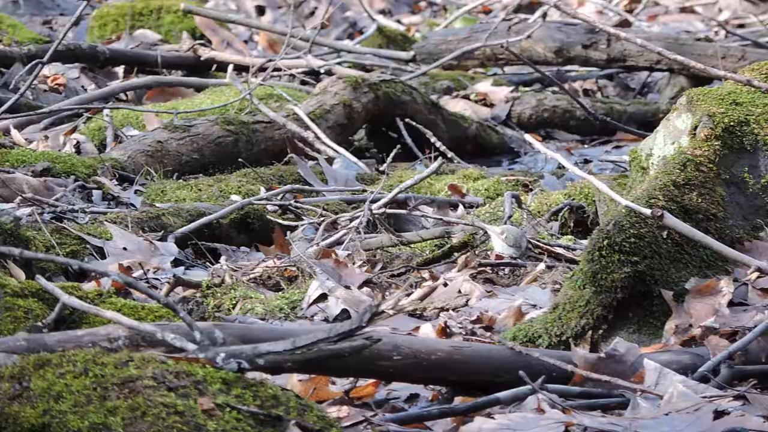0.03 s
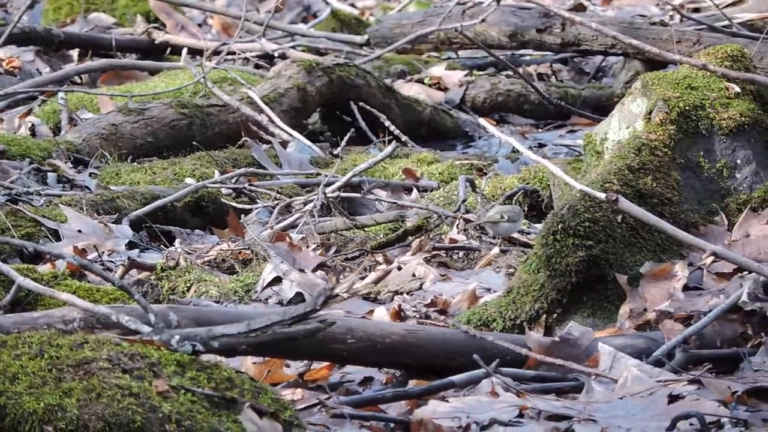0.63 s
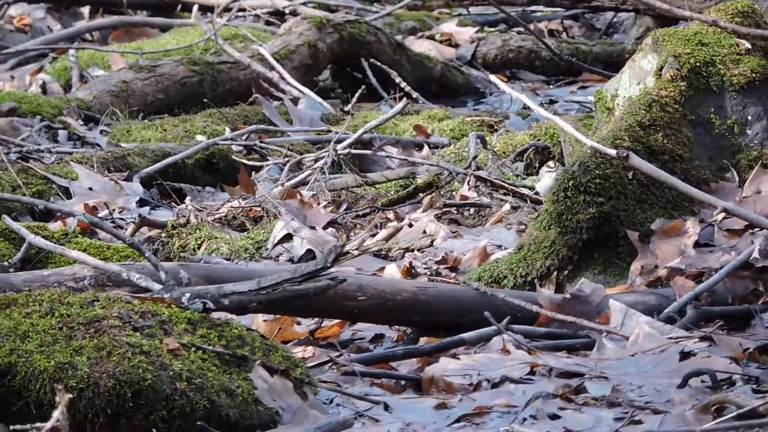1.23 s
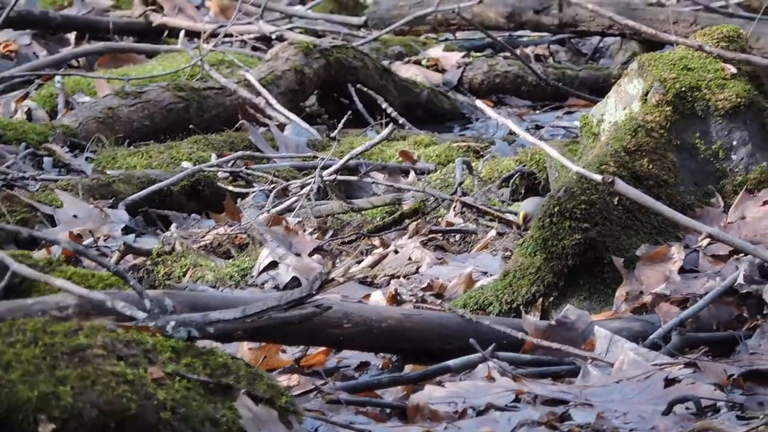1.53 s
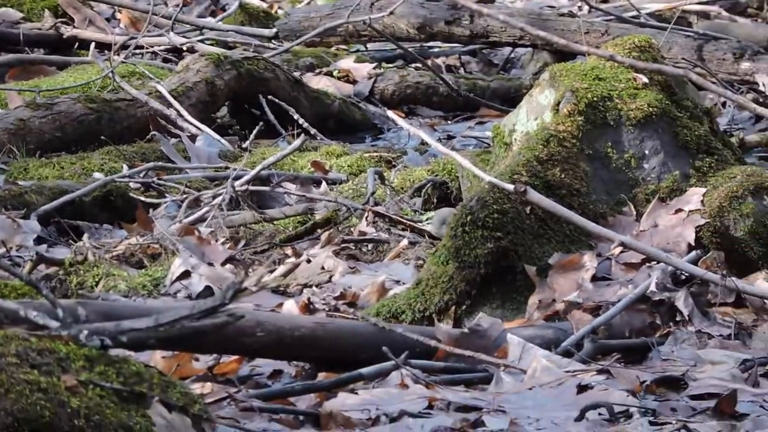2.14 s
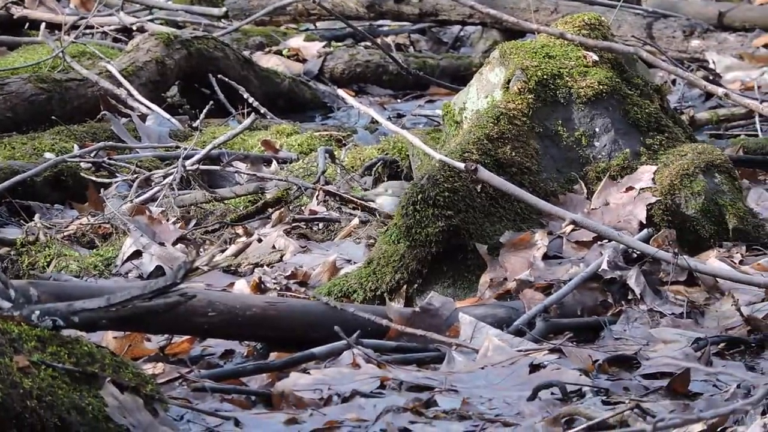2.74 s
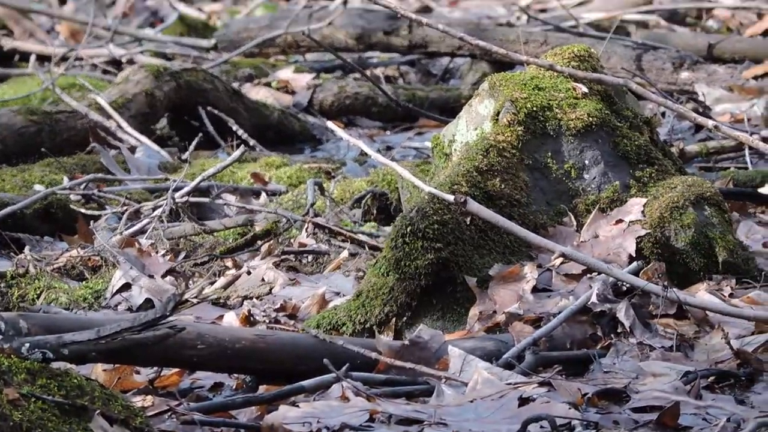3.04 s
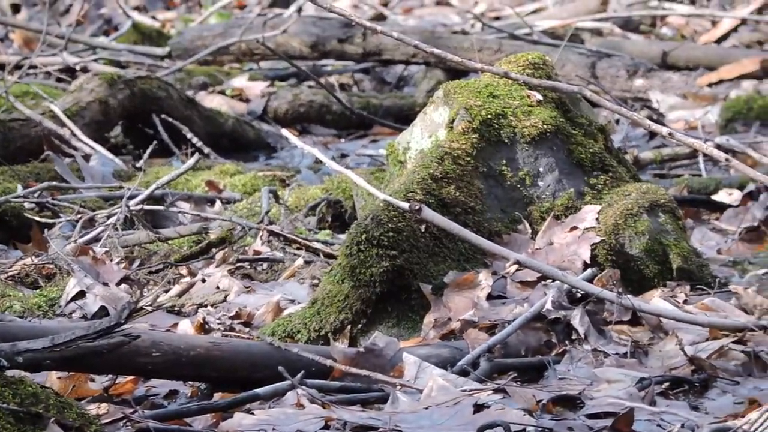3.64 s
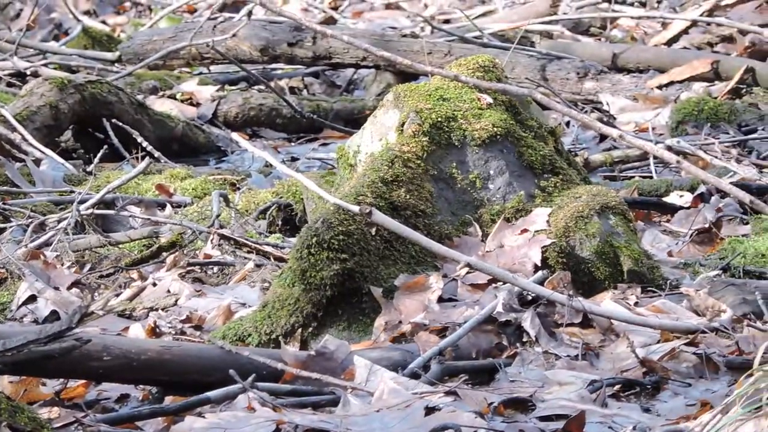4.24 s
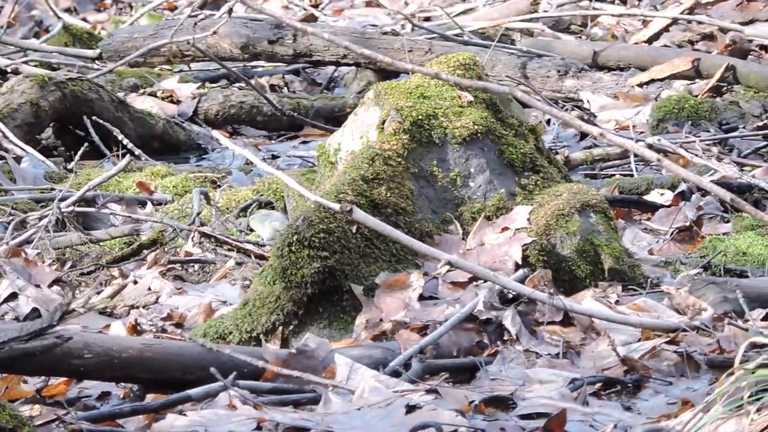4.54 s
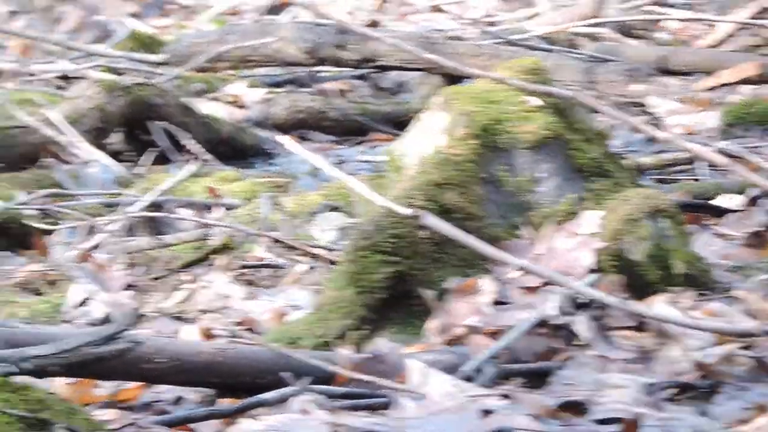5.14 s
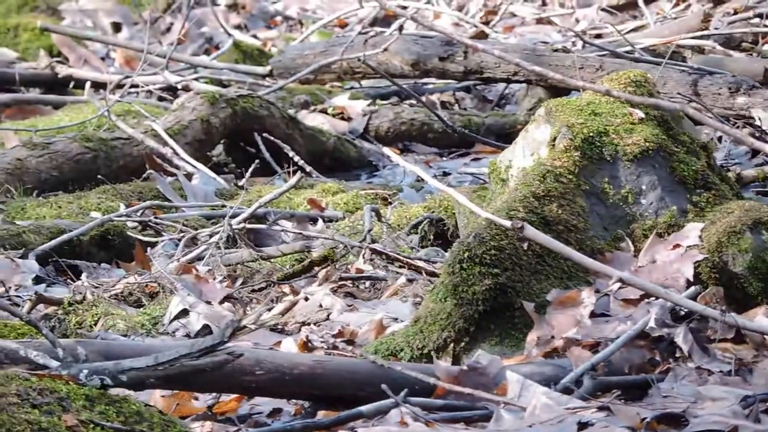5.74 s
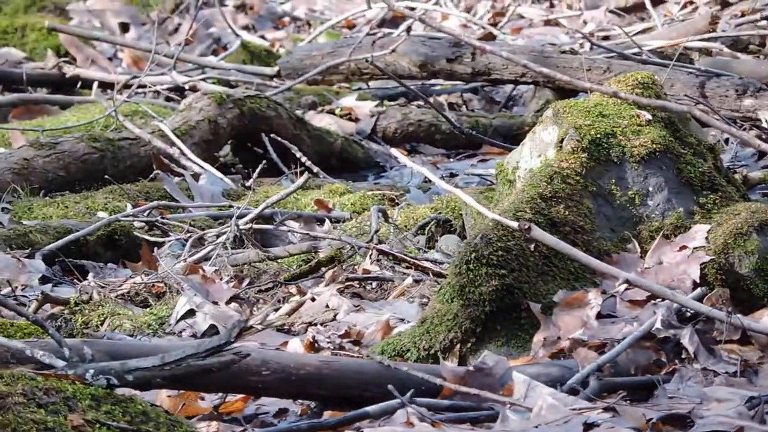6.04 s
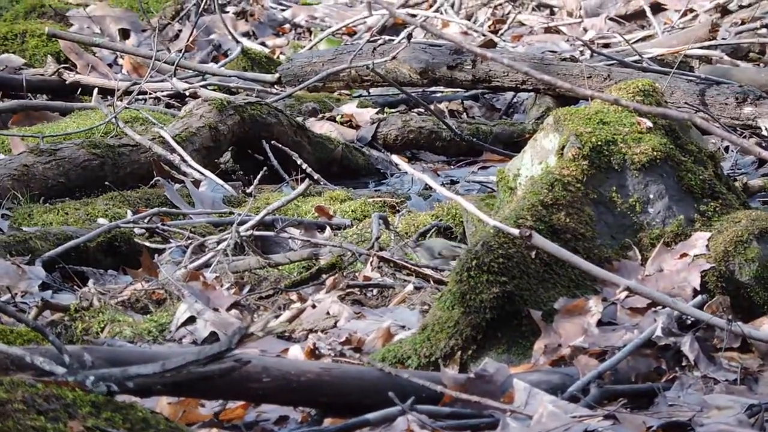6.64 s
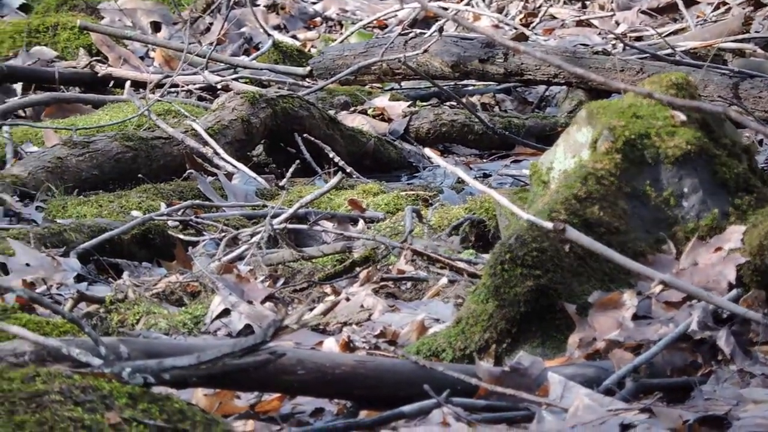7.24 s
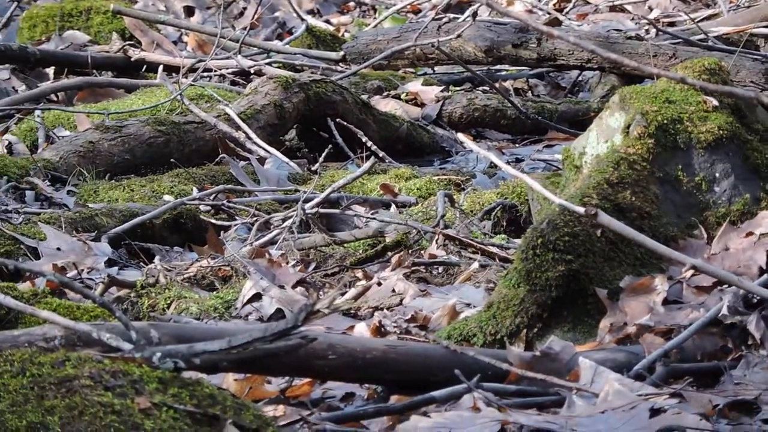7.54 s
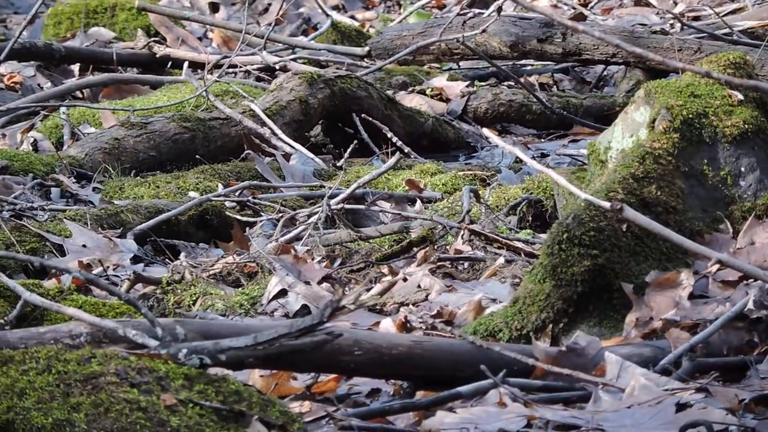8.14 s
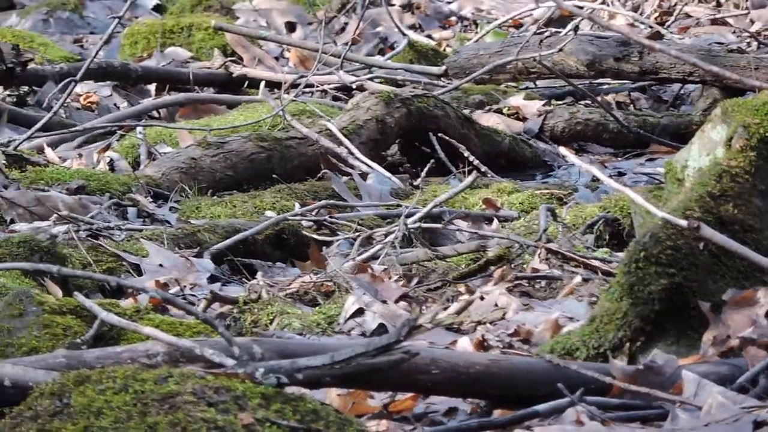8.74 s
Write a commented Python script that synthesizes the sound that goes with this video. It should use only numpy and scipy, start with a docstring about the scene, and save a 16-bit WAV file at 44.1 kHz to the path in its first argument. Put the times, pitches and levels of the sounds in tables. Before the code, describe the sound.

Far traffic rumbles steadily through a forest, mixed with a wavering machine hum, a light breeze and a soft hiss. A small songbird gives faint, thin, very high chirps at irregular intervals, and a twig ticks a few times around the middle. Near the end a distant woodpecker calls a quick, even run of hoarse notes while another bird adds three faint descending whistles. The stereo sound is quiet and wide.

```python
"""Far traffic rumbles and roars through a damp spring forest: engine and tyre noise, dulled by the air.
Distant machinery hums under it in wavering tones. A small songbird whistles thin, very high contact
calls, a far woodpecker calls a run of even notes, another bird whistles three times and a twig ticks
now and then, all scattered by the trunks. Light breeze and hiss lie behind.
The sound fades in over the first second."""
import sys
import numpy as np
from scipy import signal
from scipy.fft import rfft, irfft, next_fast_len
from scipy.io import wavfile
from scipy.ndimage import map_coordinates

SR = 44100
rng = np.random.default_rng(int(sys.argv[2]) if len(sys.argv) > 2 else 0)


def inscribe(sig):
    """Save sig as 16-bit PCM at rate SR to the path in sys.argv[1].

    A 1-D sig is mono; a 2-D sig holds one channel per row.
    Samples are clipped to [-1, 1] before scaling.
    """
    pcm = np.round(np.clip(np.atleast_2d(sig).T, -1, 1) * 32767)
    wavfile.write(sys.argv[1], SR, pcm.astype(np.int16))


N = 392490


# Traffic spectrum before air absorption: (frequency [Hz], relative density [dB])
TRAFFIC_SPECTRUM = [(10, -1.5), (22, -4.5), (42, -0.5), (62, 2), (85, 1), (115, -5), (160, -10), (215, -16),
                    (330, -15.5), (480, -22), (930, -21.5), (1300, -29), (2200, -34), (4500, -39)]
# Lull and swell of the rumble: (peak time [s], half length [s], lift [dB])
RUMBLE_SWELLS = [(.2, .7, -2.5), (4.7, 1.3, 1)]

def traffic(air_hz=4200, engine_hz=170, engine_gain_db=-43.5, tyre_gain_db=-41, tyre_db_per_s=0.0771):
    """Far engine rumble and slowly rising tyre roar; the air absorbs their treble."""
    road = diffuse(lambda hz: amp(along(TRAFFIC_SPECTRUM, hz)) / np.sqrt(1 + (hz / air_hz) ** 2) ** 3)
    rumble = filtered(road, lambda hz: 1 / (1 + (hz / engine_hz) ** 4))
    tyres = (road - rumble) * amp(tyre_gain_db + tyre_db_per_s * clock())
    engines = rumble * amp(engine_gain_db + sum(swell_db(*swell) for swell in RUMBLE_SWELLS))
    return (tyres + engines) * amp(0.12 * wobble(3.17))


# Motors: (frequency [Hz], base level [dB], waver [dB], peak time [s], half length [s], lift [dB])
MOTORS = [(93.47, -45, 1.0, 0.38, 1.35, 4.5), (120.6, -58, 2, 5.07, 1.13, 10)]
# Weaker machine tones: (frequency [Hz], level [dB], waver [dB])
HUM_TONES = [(53.4, -52, 6), (106.7, -59, 2.5), (197.3, -67.5, -0.5)]

def machinery():
    """Two motors, each swelling once, over a constant hum."""
    motors = sum(drone(hz, db + swell_db(peak_s, half_s, lift_db), waver_db)
                 for hz, db, waver_db, peak_s, half_s, lift_db in MOTORS)
    return motors + sum(drone(*tone) for tone in HUM_TONES)


def drone(hz, db, waver_db, drift_hz=.15):
    """One machine tone; moving air on the long path makes it waver."""
    phase = phase_of(hz + drift_hz * wobble(2.023))
    waver = unit(amp(waver_db * wobble(2.59)))
    return np.sqrt(2) * amp(db) * waver * np.sin(phase)


# Contact calls: (start [s], length [s], pitch [Hz], level [dB])
CONTACT_CALLS = [ (.808, .022, 7350, -70), (1.435, .03, 7350, -73), (1.918, .04, 8550, -68.5),
                 (2.522, .046, 8220, -67.5), (2.760, .028, 8400, -74), (2.848, .034, 8350, -72.5),
                 (4.843, .031, 8350, -70), (5.254, .016, 6700, -72), (5.630, .058, 7660, -61.5),
                 (7.600, .028, 7150, -72.5), (7.992, .016, 7550, -72), (8.224, .044, 7400, -70),
                 (8.762, .033, 8120, -68.5)]

def songbird(home_hz=8080, glide_s=.045, arch_hz=200, flutter_hz=170, flutter_depth=0.016,
             octave_db=-15, wet_db=-3):
    """Arched whistles that slide toward a home pitch, with fast flutter and a weak octave."""
    voice = np.zeros(N)
    for start_s, length_s, hz, db in CONTACT_CALLS:
        u = np.linspace(-.5, .5, int(length_s * SR))
        pitch_hz = hz + (home_hz - hz) * u * length_s / glide_s - arch_hz * (2 * u) ** 2
        flutter = np.sin(2 * np.pi * (flutter_hz * length_s * u + rng.random()))
        phase = phase_of(pitch_hz * (1 + flutter_depth * flutter))
        envelope = np.sqrt(np.abs(np.cos(np.pi * u)))
        add(voice, start_s, amp(db) * envelope * (np.sin(phase) + amp(octave_db) * np.sin(2 * phase)))
    return voice + amp(wet_db) * trees(voice)


def woodpecker(first_s=7.081, period_s=.139, count=12, length_s=0.0542, hz=2150, rise=.04, rough=.018,
               full_db=-65.5, build_db=7, build_s=0.97, scatter_db=.6, wet_db=-5):
    """An even run of short, hoarse, rising notes that builds and holds, blurred by the trees."""
    voice = np.zeros(N)
    u = np.linspace(-.5, .5, int(length_s * SR))
    jitter = rough * wobble(250)
    for elapsed_s in period_s * np.arange(count):
        centre_s = first_s + elapsed_s
        db = full_db - build_db * max(0, 1 - elapsed_s / build_s) + scatter_db * rng.standard_normal()
        pitch_hz = hz * (1 + rise * u + jitter[round(centre_s * SR):][:len(u)])
        add(voice, centre_s - length_s / 2, amp(db) * np.cos(np.pi * u) * np.sin(phase_of(pitch_hz)))
    return voice + amp(wet_db) * trees(voice)


# Twig ticks: (time [s], gain [dB], main ring [Hz], crack re ring [dB], left re right [dB])
TWIG_TICKS = [(3.1183, -43.5, 2520, -26, -2), (4.8737, -37.5, 1350, -11, -11), (5.4244, -55, 4500, -4, 0)]
# Twig modes: (frequency re main ring [ratio], relative level [dB])
TWIG_MODES = [(.35, -2), (1, -2), (1.6, -10), (3.5, -18)]

def twigs(ring_t60_s=.008, crack_t60_s=.008, lowpass_hz=6000, wet_db=-7):
    """Dry wood ticks: a crack and a few briefly ringing modes."""
    ticks = np.zeros((2, N))
    t = np.arange(SR // 20) / SR
    for time_s, gain_db, ring_hz, crack_db, pan_db in TWIG_TICKS:
        modes = sum(amp(db) * np.sin(2 * np.pi * ratio * ring_hz * t) for ratio, db in TWIG_MODES)
        ring = amp(-60 * t / ring_t60_s) * modes
        crack = amp(crack_db - 60 * t / crack_t60_s) * rng.standard_normal((2, len(t)))
        add(ticks, time_s, amp([[gain_db + pan_db / 2], [gain_db - pan_db / 2]]) * (ring + crack))
    ticks = filtered(ticks, lambda hz: 1 / (1 + 1j * hz / lowpass_hz))
    return ticks + amp(wet_db) * trees(ticks.mean(axis=0))


# Far whistles: (start [s], length [s], pitch [Hz], level into the trees [dB])
FAR_WHISTLES = [(7.48, .22, 7280, -81), (7.72, .2, 6520, -76), (8.03, .3, 5520, -85)]

def far_bird(direct_db=-4):
    """Three flat whistles, each lower than the last, heard mostly by way of the trees."""
    voice = np.zeros(N)
    for start_s, length_s, hz, db in FAR_WHISTLES:
        envelope = signal.windows.tukey(int(length_s * SR))
        pitch_hz = hz * (1 + 0.004 * wobble(62)[:len(envelope)])
        add(voice, start_s, amp(db) * envelope * np.sin(phase_of(pitch_hz)))
    return amp(direct_db) * voice + trees(voice)


def breeze(level_db=-57, lowpass_hz=35):
    """Light air stirs each microphone on its own."""
    buffet = filtered(rng.standard_normal((2, N)), lambda hz: 1 / (1 + (hz / lowpass_hz) ** 2))
    return amp(level_db) * unit(buffet)


# Hiss spectrum: (frequency [Hz], relative density [dB])
HISS_SPECTRUM = [(1000, -27), (2500, 1.5), (5000, 0.5), (7400, -1.5), (9500, -4), (15500, -5)]

def hiss(mid_db=-69.5):
    """Steady, wide hiss of air and microphones."""
    return amp(mid_db) * diffuse(lambda hz: amp(along(HISS_SPECTRUM, hz)))


# Forest reverberation: (frequency [Hz], T60 [s])
FOREST_T60 = [(500, 0.54), (2000, 0.86), (8000, 0.39), (15000, 0.14)]

def trees(x):
    """Trunks scatter a sound into a stereo tail whose treble dies first."""
    hz, t, noise = signal.stft(rng.standard_normal((2, SR // 2)), SR, nperseg=256)
    decay = amp(-60 * t / along(FOREST_T60, hz)[:, None])
    tail = signal.istft(noise * decay, SR, nperseg=256)[1]
    return signal.fftconvolve(x[None], tail / np.linalg.norm(tail[0]), axes=1)[:, :N]


# Diffuse field: (frequency [Hz], left-right correlation [-1..1])
STEREO_CORRELATION = [(60, 0.99), (99, 0.99), (160, 0.93), (270, 0.94), (450, 0.67), (740, 0.72),
                      (1220, 0.37), (2010, -0.041), (3330, -0.08), (5500, -0.06), (9080, -0.051),
                      (15000, -0.03)]

def diffuse(gain):
    """Noise from all around, mid at rms 1; the two microphones agree only in the bass."""
    def mid_side_gain(hz):
        angle = np.arccos(np.clip(along(STEREO_CORRELATION, hz), -1, 1)) / 2
        return gain(hz) * np.array([np.ones_like(hz), np.tan(angle)])
    mid, side = filtered(rng.standard_normal((2, N)), mid_side_gain)
    return np.array([mid + side, mid - side]) / np.std(mid)


def amp(db):
    """Decibels to gain."""
    return 10 ** (np.asarray(db) / 20)


def unit(x):
    """Scale to rms 1."""
    return x / np.sqrt(np.mean(x ** 2) + 1e-20)


def along(points, hz):
    """Interpolate (frequency [Hz], value) points on a log axis."""
    knots_hz, values = np.transpose(points)
    return np.interp(np.log(hz + 1), np.log(knots_hz + 1), values)


def clock():
    """Sample times [s]."""
    return np.arange(N) / SR


def phase_of(hz):
    """Running phase [rad] of a pitch curve."""
    return 2 * np.pi * np.cumsum(hz) / SR


def swell_db(peak_s, half_s, lift_db):
    """Bell-shaped change in level."""
    return lift_db * np.exp(-((clock() - peak_s) / half_s) ** 2)


def wobble(knots_per_s):
    """Smooth random curve."""
    knots = rng.standard_normal(int(N * knots_per_s / SR) + 4)
    return map_coordinates(knots, [np.arange(N) * knots_per_s / SR])


def filtered(x, response):
    """Apply a frequency response."""
    size = next_fast_len(N + SR // 2)
    return irfft(rfft(x, size) * response(np.fft.rfftfreq(size, 1 / SR)), size)[..., :N]


def add(track, start_s, sound):
    """Mix a sound into a track."""
    part = track[..., round(start_s * SR):][..., :sound.shape[-1]]
    part += sound[..., :part.shape[-1]]


def scene():
    """Traffic, air and hum, with the small forest sounds on top."""
    bed = traffic() + breeze() + hiss() + machinery()
    return bed + songbird() + far_bird() + woodpecker() + twigs()


def record(dry, start_s=.0726, fade_s=0.93, depth_db=19, split_hz=2000, top_hz=15730):
    """Brief silence, then a fade-in, treble first; band-limited."""
    remaining = np.clip(1 - (clock() - start_s) / fade_s, 0, 1)
    bass = filtered(dry, lambda hz: 1 / (1 + (hz / split_hz) ** 2))
    treble = dry - bass
    faded = bass * amp(-depth_db * remaining ** 0.95) + treble * amp(-depth_db * remaining ** 1.8)
    return filtered(faded * (clock() > start_s), lambda hz: hz < top_hz)


dry = scene()
out = record(dry)
inscribe(out)
```